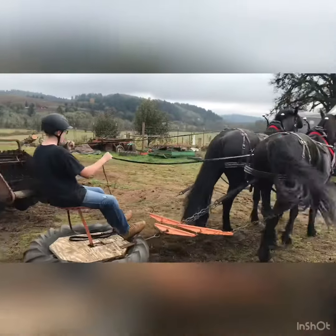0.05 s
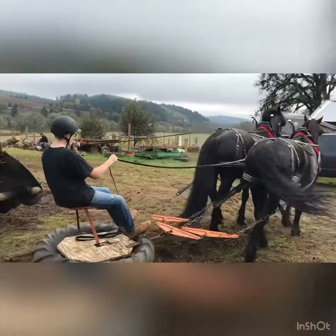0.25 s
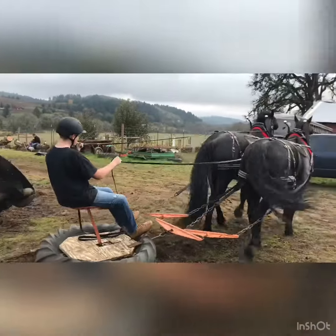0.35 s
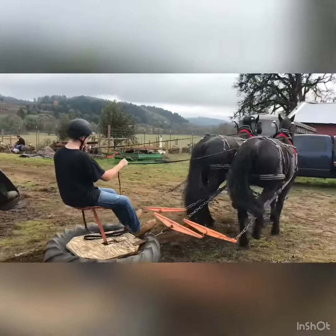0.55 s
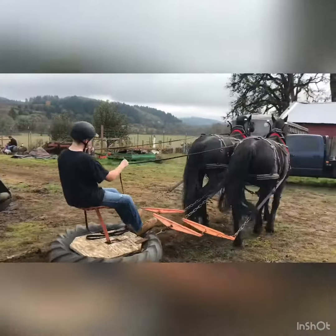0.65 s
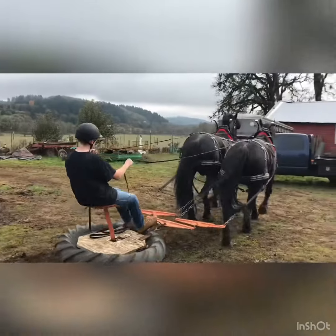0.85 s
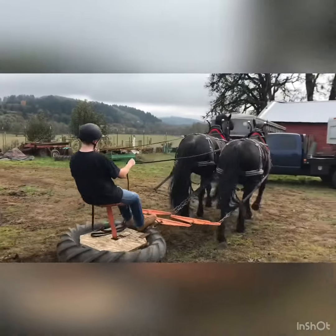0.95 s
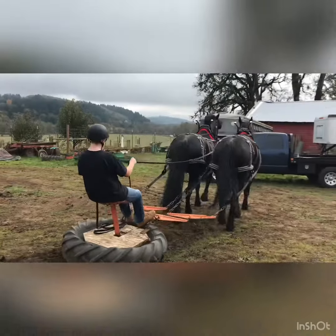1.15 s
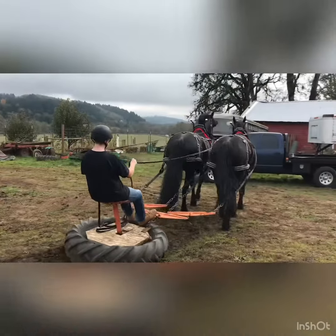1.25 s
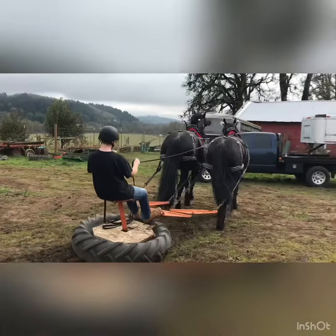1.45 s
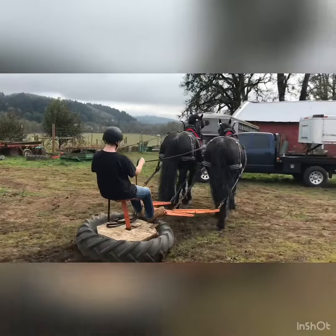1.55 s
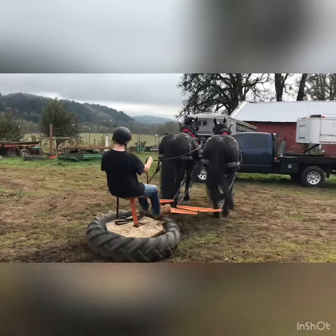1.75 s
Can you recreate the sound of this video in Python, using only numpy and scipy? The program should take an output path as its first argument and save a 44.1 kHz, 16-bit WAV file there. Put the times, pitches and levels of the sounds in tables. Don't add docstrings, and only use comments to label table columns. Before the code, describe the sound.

Bright double clank of chain hardware early, then dull hoof thuds with one heavy stamp, dry ticks and grass scuffs, and a weaker double clink near the end, in an open farmyard, heard nearby in mono.

```python
import sys
import numpy as np
from scipy import signal
from scipy.fft import rfft, irfft
from scipy.io import wavfile
from scipy.ndimage import uniform_filter1d, map_coordinates

SR = 44100
rng = np.random.default_rng(int(sys.argv[2]) if len(sys.argv) > 2 else 0)


def unload_wav(signal):
    wavfile.write(
        sys.argv[1],
        SR,
        np.round(np.clip(np.atleast_2d(signal).T, -1, 1) * 32767).astype(np.int16),
    )


def attenuation_scalar(level_db):
    decades = np.asarray(level_db, float) / 20
    return 10 ** decades


N = 79380


def unit(x):
    return x / np.sqrt(np.mean(x ** 2) + 1e-20)


def add(track, s, x):
    part = track[round(s * SR):][:len(x)]
    part += x[:len(part)]


def noise(points, size, tilt_db=0, patchy_db=0):
    z = signal.stft(rng.standard_normal(size + 2048), nperseg=512)[2]
    field = uniform_filter1d(rng.standard_normal(z.shape), size=6, axis=0)
    field = uniform_filter1d(field, size=8, axis=1)
    x = signal.istft(z * attenuation_scalar(patchy_db * unit(field)), nperseg=512)[1]
    f, level_db = np.transpose(points)
    hz = np.fft.rfftfreq(len(x), 1 / SR) + 1
    colour_db = np.interp(np.log(hz), np.log(f), level_db, left=-120, right=-120)
    gain = attenuation_scalar(colour_db + tilt_db * np.log2(hz / 3000))
    return unit(irfft(rfft(x) * gain, len(x))[:size])


def curve(rows):
    return np.interp(np.arange(N) / SR, *np.transpose(rows))


def wobble(rate):
    knots = rng.standard_normal(int(N * rate / SR) + 4)
    return map_coordinates(knots, [np.arange(N) * rate / SR])


def blip(hz, cycles=1.1):
    u = np.arange(SR // 20) / SR * hz
    return np.sin(2 * np.pi * u) * (u / cycles) * np.exp(1 - u / cycles * 2) * 2


def rattle(colour, t, t60):
    hz = np.sort(rng.uniform(400, 15500, size=(150, 1)), axis=0)
    f, level_db = np.transpose(colour)
    scatter_db = 3 * rng.standard_normal(hz.shape)
    db = np.interp(np.log(hz), np.log(f), level_db) + scatter_db
    life = t60 * np.where(hz > 4800, .6, 1) * rng.uniform(.7, 1.3, hz.shape)
    phase = rng.random(hz.shape)
    rings = (attenuation_scalar(db - 60 * t / life) * np.sin(2 * np.pi * (hz * t + phase))).sum(0)
    hiss = noise(colour, size=len(t), patchy_db=.7) * attenuation_scalar(-1 - 60 * t / (t60 * .8))
    return rings / np.sqrt(np.sum(attenuation_scalar(db) ** 2) / 2) + hiss


# (time [s], ring [dB], crack [dB], clatter [dB], clatter t60 [s])
CONTACTS = [
    (0.2087, 2.5, -8, -19, 0.13),
    (0.2442, 2, -11.5, -22.5, 0.13),
    (1.4223, 4.5, -31, -32.5, 0.12),
    (1.4477, 3, -28.5, -38, 0.17),
]
# (frequency [Hz], level [dB], t60 [s])
END_MODES = [(545, -35, .15), (1170, -24, .08), (2011, -24, .04), (1831, -19, .4), (2153, -13, .085),
             (2625, -31, .25), (3036, -16, .09), (3258, -28, .08), (3700, -34, .1), (4054, -34, .2),
             (4264, -30, .4), (4466, -35, .2), (619, -38, .12), (912, -41, .2)]
BOUNCE_MODES = [(554, -37, .28), (619, -37, .15), (912, -38, .25), (1115, -36, .45), (1678, -30, .14),
                (1831, -35, .75), (2153, -26, .12), (2629, -31, .17), (3033, -31, .14), (1555, -33, .1),
                (3700, -38, .16), (3828, -29, .1), (4269, -36, .26), (4468, -40, .17)]
MIDDLE_MODES = [(770, -41, .08), (1114, -38, .6), (1583, -42, .12), (1830, -40, .35), (2150, -31, .1),
                (3870, -46, .08), (3262, -49, .3), (3400, -41, .08), (4046, -54, .3), (4264, -55, .3),
                (4590, -52, .15), (3280, -24, .022), (6024, -48, .2), (2040, -29, .028)]
REBOUND_MODES = [(890, -53, .15), (1114, -37, .48), (1570, -44, .13), (1720, -45, .13), (1832, -53, .7),
                 (2152, -38, .11), (2760, -46, .22), (3262, -50, .3), (1351, -52, .2), (4044, -50, .33),
                 (4264, -52, .35), (4613, -57, .25), (6024, -50, .09), (3058, -54, .25)]
# (frequency [Hz], level [dB], t60 [s])
HOOK_MODES = [(5212, -37, .1), (5416, -45, .12), (6075, -37, .09), (6600, -37, .06), (7700, -40, .09),
              (8700, -43, .04)]
HOOK_LEVELS = [-2, -8.5, -15, -26]
# (frequency [Hz], density [dB per Hz])
END_CLATTER = [(300, -12), (550, -7.5), (1400, 1), (2300, -7), (3300, 1.5), (6300, -13.5), (7500, -14.5),
               (15500, -41.5)]
MIDDLE_CLATTER = [(400, -16), (700, -5), (1200, -10), (2100, 0), (2600, -4.5), (3400, 0.5), (5000, -20),
                  (12000, -43)]


def bar():
    out, t = np.zeros(N), np.arange(SR // 2) / SR
    crack_hz, crack_s, rise_s = 1878, 0.00086, 0.00072
    choke_db, settle_s = -26, .18
    crack = np.sin(2 * np.pi * crack_hz * t) * t / crack_s * np.exp(1 - t / crack_s)
    rise = 1 - np.exp(-t / rise_s)
    following = CONTACTS[1:] + CONTACTS[:1]
    bar_modes = (END_MODES, BOUNCE_MODES, MIDDLE_MODES, REBOUND_MODES)
    colours = (END_CLATTER, END_CLATTER, MIDDLE_CLATTER, MIDDLE_CLATTER)
    struck = zip(CONTACTS, following, bar_modes, colours, HOOK_LEVELS)
    for (s, ring_db, crack_db, clatter_db, t60), (later, *_), modes, colour, hook_db in struck:
        modes = modes + [(hz, db + hook_db, d) for hz, db, d in HOOK_MODES]
        stopped = np.clip((t - (later - s) % 10) * 1000, 0, 1)
        choke = attenuation_scalar(choke_db * stopped - 10 * (t / settle_s) ** 2)
        ring = np.zeros(len(t))
        for k, (hz, db, d) in enumerate(modes):
            ring += (-1) ** k * attenuation_scalar(db - 60 * t / d) * np.sin(2 * np.pi * hz * t)
        links = rattle(colour, t, t60)
        body = attenuation_scalar(ring_db) * choke * ring + attenuation_scalar(clatter_db) * links
        add(out, s, rise * body + attenuation_scalar(crack_db) * crack)
    return out


# (time [s], level [dB], frequency [Hz], t60 [s], rise [s])
BUCKLE_RINGS = [
    (1.56, -42, 5325, .07, .01),
    (1.57, -44, 5295, .07, .006),
    (1.592, -53, 5315, .12, .004),
    (0.199, -36, 3036, .06, .01),
]


def buckles():
    out, t = np.zeros(N), np.arange(SR // 2) / SR
    for s, db, hz, t60, rise_s in BUCKLE_RINGS:
        rise = 1 - np.exp(-t / rise_s)
        add(out, s, attenuation_scalar(db - 60 * t / t60) * rise * np.sin(2 * np.pi * hz * t))
    return out


# (time [s], peak level [dB], start frequency [Hz], rise [s], fall of pitch [1/s])
HOOF_THUDS = [(0.442, -39.5, 134.4, 0.0052, 5.7), (0.715, -29.5, 96, 0.0084, 5.1),
              (0.665, -34, 87, 0.0082, 3.6), (1.353, -33.5, 90.6, 0.0083, 2.8),
              (1.452, -37.5, 78.5, 0.019, 4.2), (1.697, -30, 86.3, 0.015, 8),
              (1.091, -38.5, 78, 0.0071, 2.1), (1.142, -35, 80, 0.0087, 3.5), (1.215, -36, 82, 0.018, 1.6),
              (1.297, -41.5, 79, 0.011, 2.7), (1.64, -35.5, 69.6, 0.0093, 3.1), (0.003, -38, 87, 0.01, 2.2),
              (0.072, -38.5, 102, 0.0083, 6.7), (0.142, -42, 101, 0.009, 3.3),
              (0.601, -35.5, 68.9, 0.023, 0.88), (0.843, -38.5, 74.4, 0.025, 0.91)]
# (time [s], level [dB], frequency [Hz], rise [s], fall [1/s])
HEAVY_STAMP = (0.932, -14.8, 105, .0098, 13)


def thuds():
    out, t = np.zeros(N), np.arange(SR // 5) / SR
    for s, db, hz, rise, fall in HOOF_THUDS + [HEAVY_STAMP]:
        turns = hz * (1 - np.exp(-fall * t)) / fall
        u = t / rise / 2
        swell = u ** 2 * np.exp(2 - t / rise) / (1 + u) * 2
        add(out, s, attenuation_scalar(db) * swell * np.sin(2 * np.pi * turns))
    return out


# (time [s], peak level [dB], frequency [Hz])
HOOF_KNOCKS = [(0.063, -45, 330), (0.449, -37, 480), (0.737, -34, 310), (0.833, -40, 340),
               (0.930, -37, 370), (1.042, -43, 250), (1.347, -41, 400), (1.692, -35, 240),
               (0.503, -41, 550), (0.112, -42, 700), (0.218, -38, 210), (0.255, -41, 350), (0.29, -42, 250),
               (0.455, -40, 170), (0.566, -43, 420), (0.875, -43, 420), (1.348, -42, 900),
               (1.694, -44, 800)]


def knocks():
    out = np.zeros(N)
    for s, db, hz in HOOF_KNOCKS:
        add(out, s, -attenuation_scalar(db) * blip(hz))
    return out


# (time [s], peak level [dB], centre frequency [Hz])
DRY_TICKS = [(0.029, -35, 5500), (0.302, -33, 10000), (0.567, -36, 4500), (0.7005, -38, 5000),
             (0.830, -41, 9000), (0.8635, -35, 8000), (0.958, -39, 12500), (0.998, -37, 9500),
             (1.0137, -29, 7200), (1.369, -35, 2200), (1.584, -46, 2500), (0.449, -42, 1800),
             (0.466, -42, 3000), (0.713, -40, 2500), (0.742, -41, 3800), (1.72, -46, 2500),
             (0.832, -37, 13000), (0.838, -42, 3000), (0.868, -43, 5500), (0.896, -42, 7000),
             (0.979, -43, 5500), (0.989, -44, 11000), (0.704, -42, 6500), (0.714, -42, 7500),
             (0.724, -41, 8500), (0.449, -43, 4300), (0.567, -44, 14000), (0.701, -45, 13000)]


def ticks():
    out = np.zeros(N)
    for s, db, hz in DRY_TICKS:
        add(out, s, attenuation_scalar(db) * blip(hz))
    return out


# (start [s], length [s], level [dB], brightness [dB per octave])
HOOF_SCUFFS = [(0.092, 0.22, -56, 10.5), (0.439, 0.14, -52, 5.5), (0.569, 0.02, -53, 7.5),
               (0.698, 0.072, -51, 7.5), (0.824, 0.054, -51.5, 7.5), (0.859, 0.023, -52.5, 11),
               (0.957, 0.033, -56, 3.5), (1.191, 0.049, -60, 6.5), (1.321, 0.14, -53.5, 3),
               (1.683, 0.058, -59.5, 4)]
# (frequency [Hz], density [dB per Hz])
SCUFF_COLOUR = [(300, 6), (700, 15.5), (1500, 8), (3500, -1.5), (8000, -17), (15800, -28.5)]


def scuffs():
    out, t = np.zeros(N), np.arange(SR // 5) / SR
    for s, length, db, tilt_db in HOOF_SCUFFS:
        grit = attenuation_scalar(2.6 * uniform_filter1d(rng.standard_normal(len(t)), size=64) * 7.6)
        shape = np.sin(np.pi * np.clip(t / length, 0, 1) ** 0.37)
        blades = noise(SCUFF_COLOUR, size=len(t), tilt_db=tilt_db, patchy_db=.8)
        add(out, s, attenuation_scalar(db) * shape * unit(grit * blades))
    return out


# (time [s], level [dB])
DRONE_LEVEL = [(0.0, -42.5), (0.29, -43), (0.486, -42.5), (0.62, -45), (0.842, -41), (1.06, -43),
               (1.248, -44), (1.55, -42.5), (1.8, -46.5)]
# (frequency [Hz], density [dB per Hz])
DRONE_COLOUR = [(15, -59), (25, -67), (44, -5.5), (68, 1.5), (110, -10.5), (183, -15), (274, -20.5),
                (500, -30), (650, -35), (1100, -120)]


def tyre():
    drone = noise(DRONE_COLOUR, size=N, patchy_db=0.5)
    power = uniform_filter1d(uniform_filter1d(drone ** 2, size=2000), size=2000)
    swell = np.sqrt(np.abs(power))
    return attenuation_scalar(curve(DRONE_LEVEL)) * unit(drone / swell ** .8)


# (time [s], level [dB])
RUSTLE_LEVEL = [(0.0, -57.5), (0.15, -58), (0.27, -58.5), (0.38, -60.5), (0.486, -62), (0.65, -59.5),
                (0.82, -60), (0.93, -60), (1.15, -61), (1.378, -60), (1.508, -60), (1.63, -63.5),
                (1.8, -60.5)]
# (frequency [Hz], density [dB per Hz])
RUSTLE_COLOUR = [(200, -71), (350, -6), (900, -3.5), (1860, -10.5), (4200, -13), (9500, -16.5),
                 (10400, -22), (15800, -21)]


def grass():
    level_db = curve(RUSTLE_LEVEL) + 5.5 + .7 * wobble(12) + .6 * wobble(60)
    return attenuation_scalar(level_db) * noise(RUSTLE_COLOUR, size=N, patchy_db=.8)


# (time [s], level [dB], frequency [Hz])
BIRD_CHIPS = [(1.055, -54, 4500), (1.116, -57, 4400), (1.682, -54, 4400), (1.745, -53, 4400),
              (0.574, -52, 3700), (0.72, -53, 3500), (0.617, -58, 3300), (0.962, -58, 3800)]


def bird():
    chip_s, drop, rough = .014, .1, .9
    out, u = np.zeros(N), np.arange(round(chip_s * SR)) / (chip_s * SR)
    for s, db, hz in BIRD_CHIPS:
        husk = 1 + rough * unit(uniform_filter1d(rng.standard_normal(len(u)), size=24))
        turns = np.cumsum(hz * (1 + drop * (.5 - u))) / SR
        add(out, s, attenuation_scalar(db) * husk * np.sin(np.pi * u ** 0.72) * np.sin(2 * np.pi * turns))
    return out


def yard(x):
    t60, level_db = .15, -20
    t = np.arange(SR // 3) / SR
    tail = rng.standard_normal(len(t)) * attenuation_scalar(-60 * t / t60) * (t > .003)
    return attenuation_scalar(level_db) * signal.fftconvolve(x, tail / np.linalg.norm(tail))[:N]


def scene():
    high_pass = signal.butter(2, 330, 'high', fs=SR, output='sos')
    near = signal.sosfilt(high_pass, bar() + buckles()) + bird()
    scattered = near + yard(near)
    hooves = thuds() + knocks() + ticks() + scuffs()
    sled = tyre() + grass()
    return (scattered + hooves + sled)[None]


def band_limit(x):
    return signal.sosfilt(signal.butter(12, 16330, fs=SR, output="sos"), x)


def record(dry):
    low_cut_hz, top_hz = 57, 15900
    hz = np.fft.rfftfreq(N, 1 / SR)
    band = (hz < top_hz) / np.sqrt(1 + (low_cut_hz / (hz + 1)) ** 8)
    mix = irfft(rfft(dry) * band, N)
    return band_limit(mix)


dry = scene()
out = record(dry)
unload_wav(out)
```